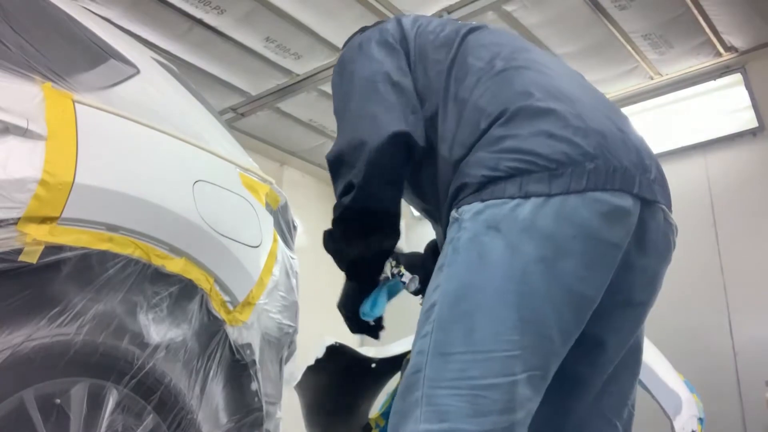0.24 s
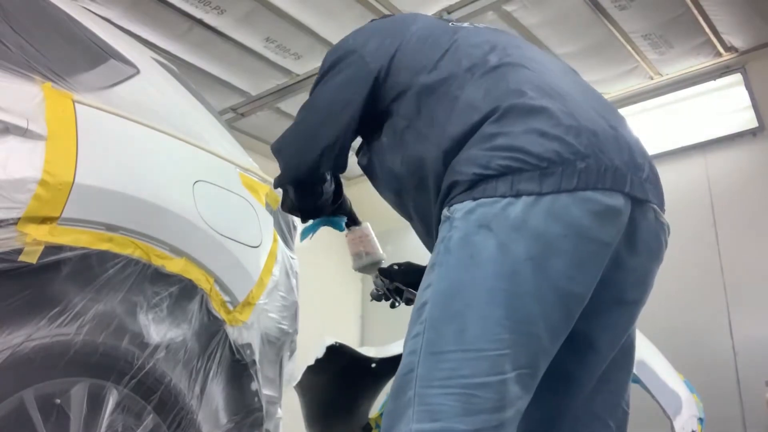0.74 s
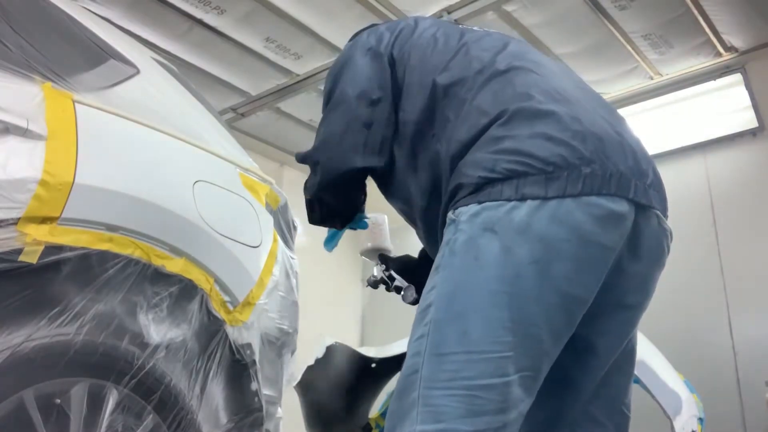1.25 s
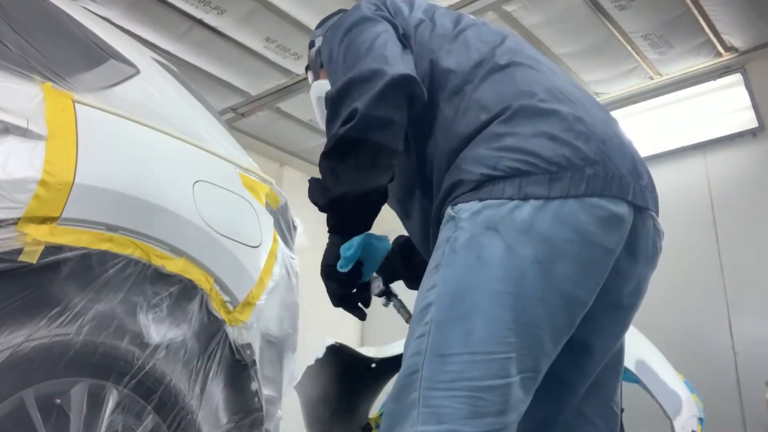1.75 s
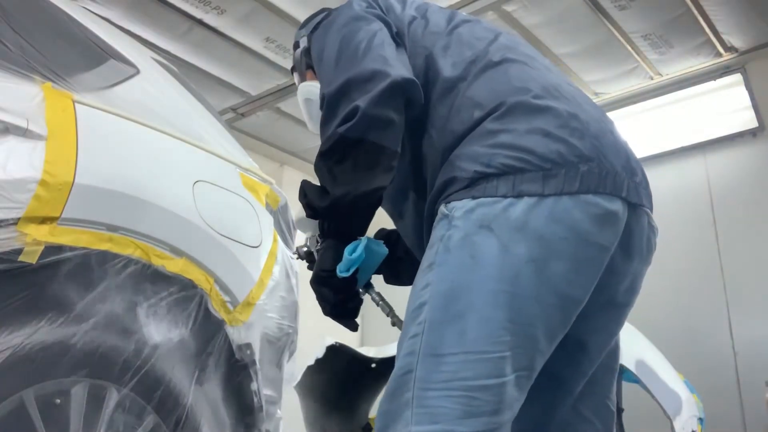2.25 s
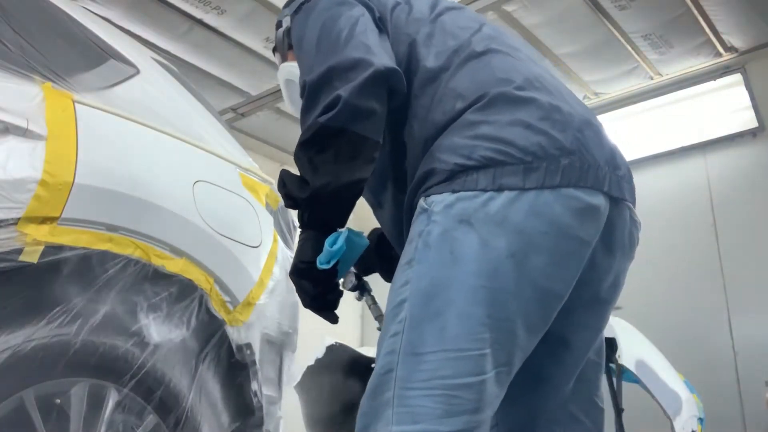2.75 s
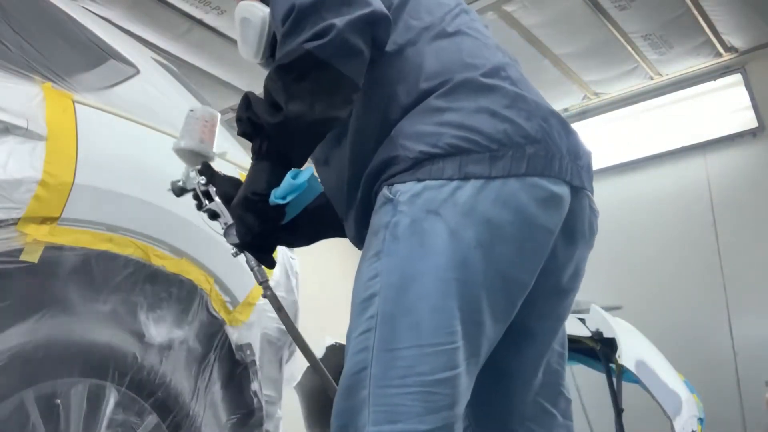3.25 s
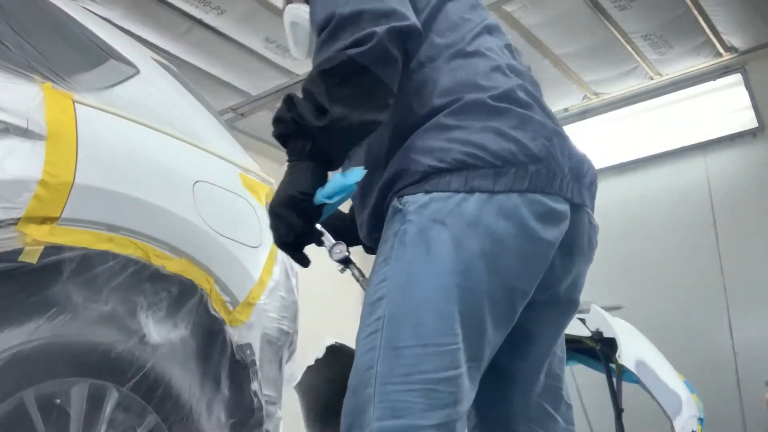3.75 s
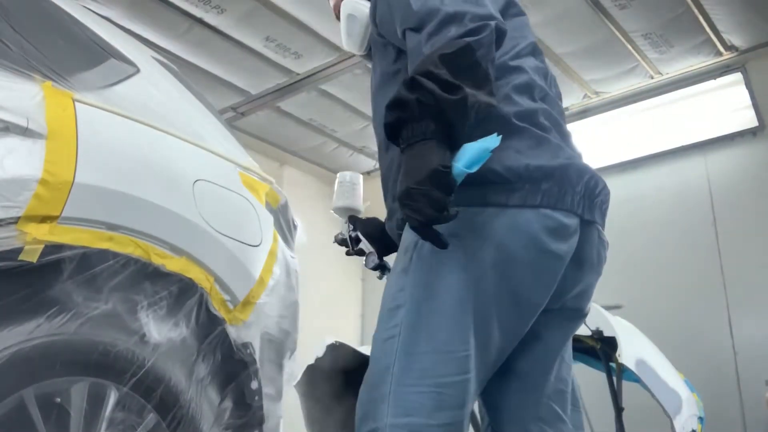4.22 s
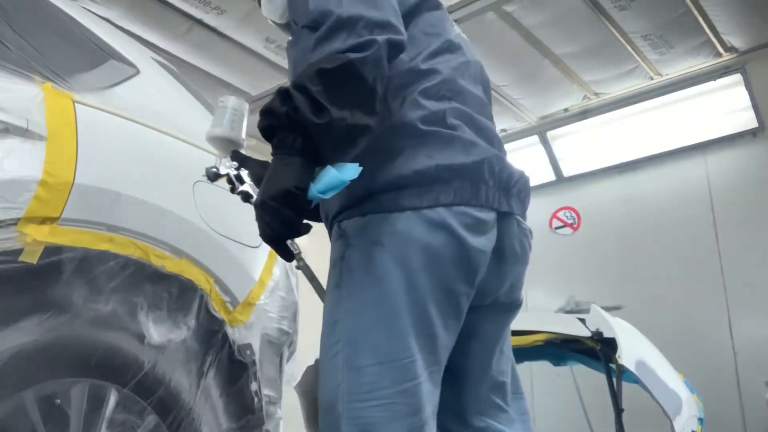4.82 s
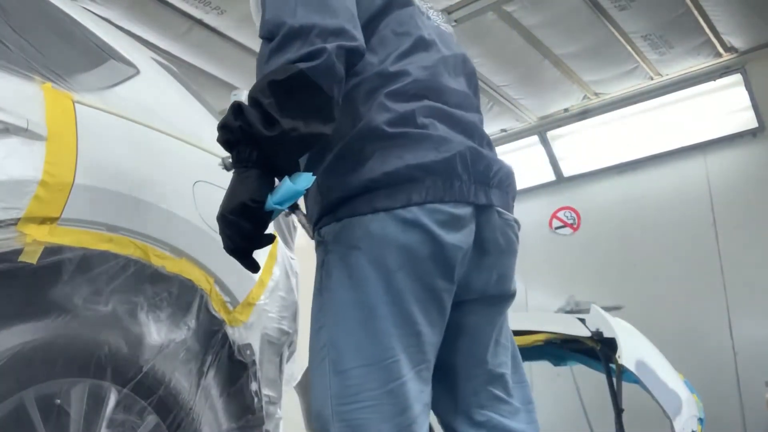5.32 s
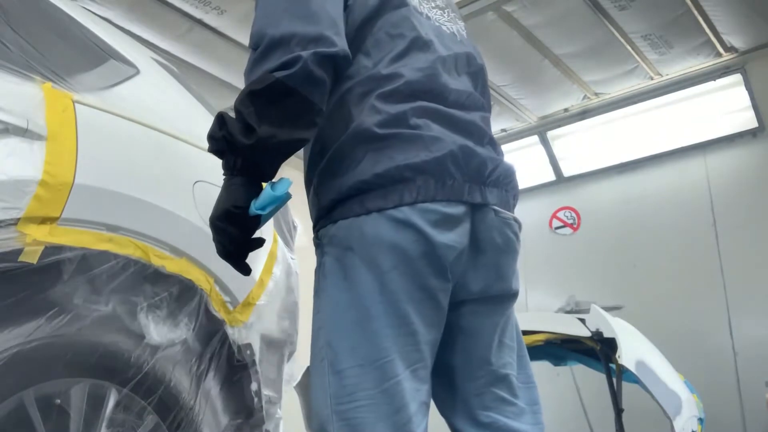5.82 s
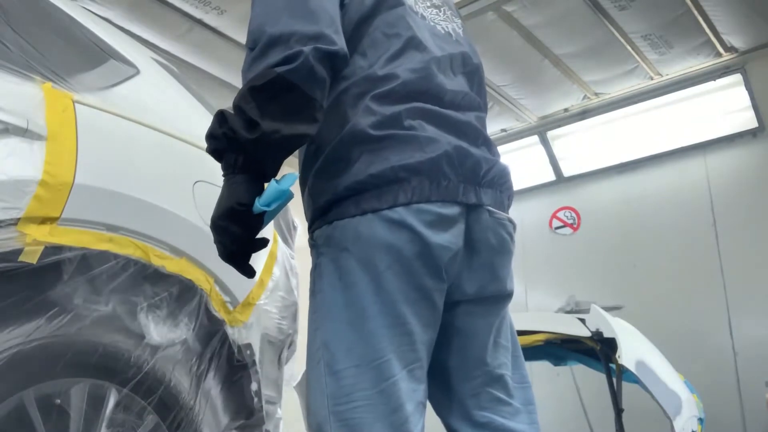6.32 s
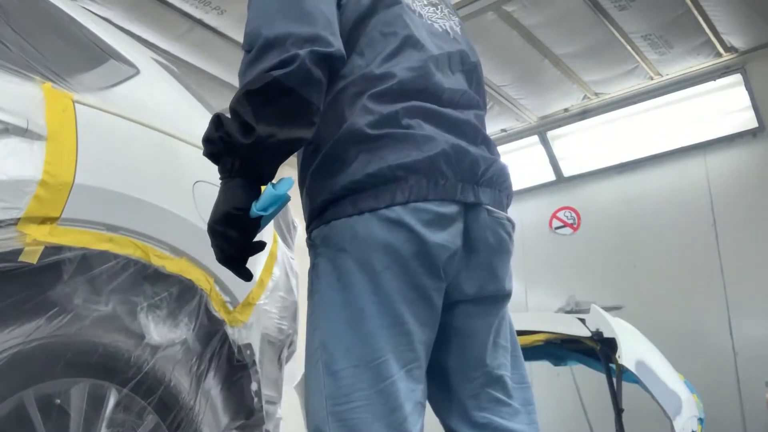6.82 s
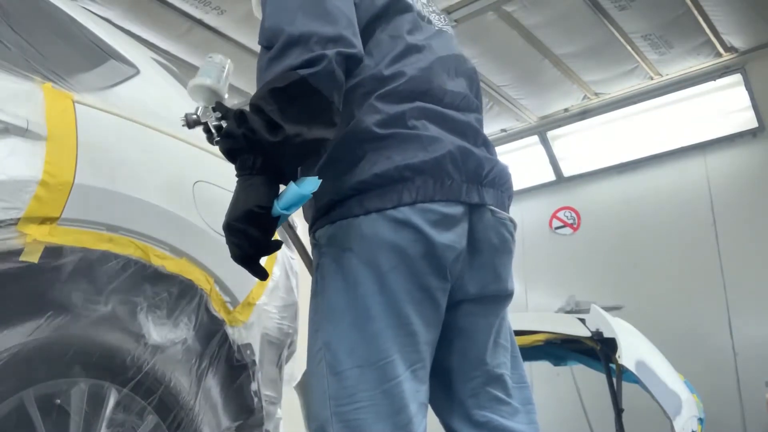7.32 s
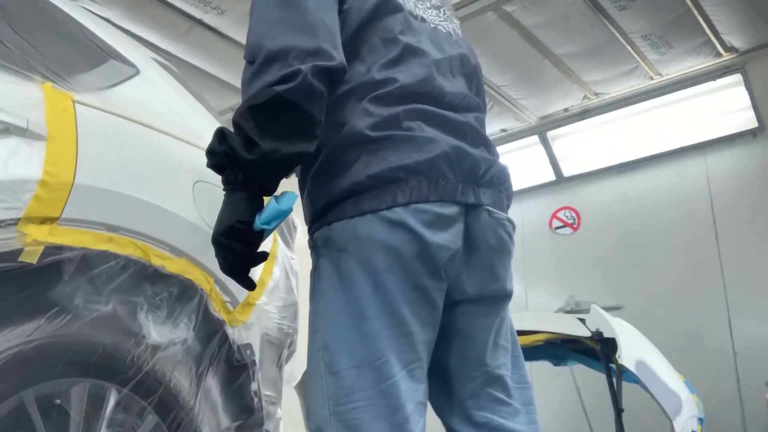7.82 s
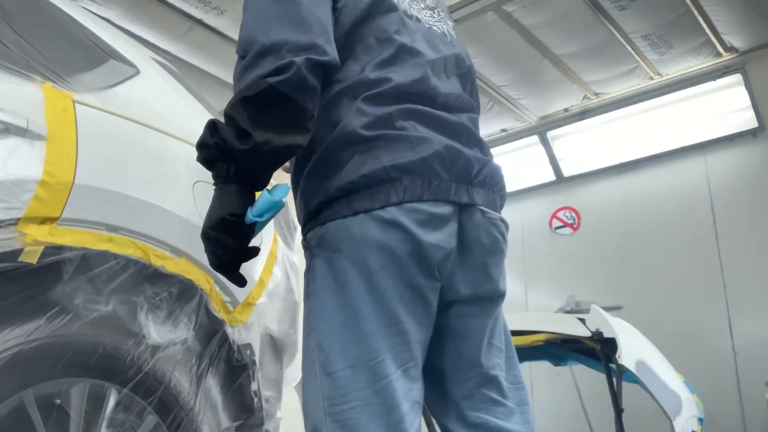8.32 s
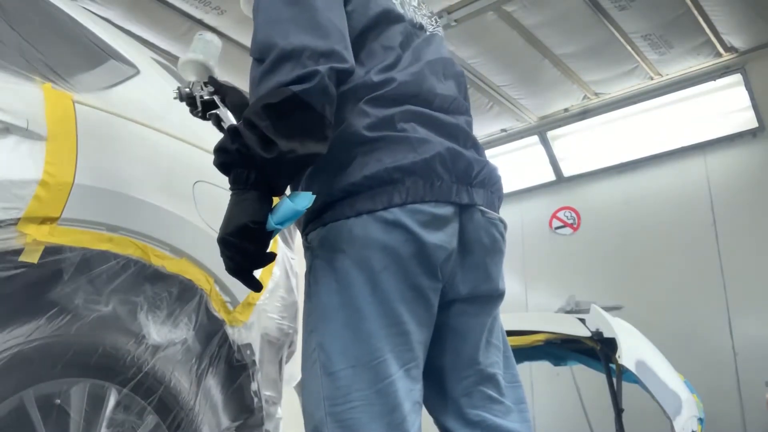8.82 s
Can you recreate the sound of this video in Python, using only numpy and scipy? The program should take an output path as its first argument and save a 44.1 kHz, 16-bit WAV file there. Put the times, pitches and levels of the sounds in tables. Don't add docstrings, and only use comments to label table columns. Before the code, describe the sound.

Throughout about nine seconds, an extraction fan fills an enclosed metal paint booth with deep duct rumble, rushing air, a wavering low hum and irregular low booms, slightly louder in the first second. A spray gun is already hissing at the start and stops at 0.2. It eases open from 0.4 to 1.1, then snaps through quicker strokes at 1.3-1.65, 1.75-2.3 and 2.35-2.7. Longer strokes follow at 2.8-4.3 and 4.4-6.0, brightening near 3.5 and 5.15 as the spray swings toward the microphone. A softer half-second burst begins at 6.25, then a gentle start at 6.8 leads into a long stroke until 8.85, brightest near 7.5 and duller around 8.3. A last hard snap comes at 8.9. Each stroke combines sharp, very high air hiss with a midrange scrub on the panel, cut quickly with a brief wall echo. Close, floor-level stereo microphone.

```python
import sys
import numpy as np
from scipy import signal
from scipy.fft import rfft, irfft, next_fast_len
from scipy.io import wavfile
from scipy.ndimage import uniform_filter1d, map_coordinates

SR = 44100
rng = np.random.default_rng(int(sys.argv[2]) if len(sys.argv) > 2 else 0)


def wrap_up_sound(samples):
    columns = np.atleast_2d(samples).T
    tamed = np.clip(columns, -1, 1)
    steps = np.round(tamed * 32767).astype(np.int16)
    wavfile.write(sys.argv[1], SR, steps)


def level_to_linear(level):
    exponent = np.asarray(level, float) / 20
    return 10 ** exponent


N = 399546

# [f/Hz, level/dB per Hz]
HISS_SPECTRUM = [(4000, -38), (6000, -10.5), (7200, -5.5), (9000, -2), (11000, -0.5), (13000, -1),
                 (15000, -0.5), (15800, 0)]
SCRUB_SPECTRUM = [(900, -28), (1600, -6), (2200, -1), (3500, -1.5), (5000, 1.5), (6300, -0.5), (7200, -4),
                  (9000, -20)]
# [t/s, opening time/s, pressure surge/dB]
TRIGGER_OPENS = [
    (.007, .011, 5),
    (.365, .08, 2.5),
    (1.271, .008, 7),
    (1.741, .008, 5),
    (2.343, .008, 8),
    (2.771, .008, 7.5),
    (4.381, .01, 6.5),
    (6.241, .011, 4.5),
    (6.829, .01, 4),
    (8.916, .009, 7.5),
]
TRIGGER_SHUTS = [.18, 1.14, 1.654, 2.272, 2.69, 4.283, 6.012, 6.757, 8.853, 9.2]
# [t/s, hiss level/dB, scrub level/dB, right port later/us]
GUN_PATH = [(0, -31, -38.5, -55), (.5, -24, -38, -60), (1.1, -28.5, -40.5, -60), (1.4, -32.5, -40, -57),
            (2.0, -30.5, -38, 0), (2.85, -30, -39.5, -2), (3.15, -27, -35.5, 79), (3.6, -28, -36, 81),
            (3.9, -28, -37, 0), (4.3, -30, -40, -5), (4.7, -27, -35.5, 70), (5.15, -27, -36, 75),
            (5.7, -32.5, -41.5, 20), (6.8, -34.5, -42, 0), (7.1, -29.5, -35.5, 60),
            (7.55, -28.5, -35.5, 76), (8.0, -33.5, -41, 0), (8.75, -28.5, -35, 80)]
# [t/s, extra hiss level/dB]
WRIST_FLIPS = [
    (.17, -1),
    (.475, -1.5),
    (1.49, 1),
    (2.27, 0.5),
    (3.474, 3),
    (4.28, -0.5),
    (5.15, 4),
    (6.0, 1.5),
    (7.462, 4.5),
    (8.33, -3.5),
]
# [t60/s, echo over direct level/dB]
BOOTH_ECHO = [
    (.21, 4),
    (.33, 7),
]

# [f/Hz, level/dB per Hz]
RUMBLE_SPECTRUM = [(20, -28), (32, -21), (42, 0), (65, -2.5), (105, -1.5), (165, -3), (260, -2.5),
                   (400, -6.5), (520, -14), (800, -31.5)]
RUSH_SPECTRUM = [(250, -19), (450, -2.5), (700, -4), (1100, -8), (1600, -13), (2200, -22), (4500, -23),
                 (5200, -28.5), (9000, -30), (15800, -35)]
BOOM_SPECTRUM = [(72, -57), (79, 3), (84, -1.5), (94, -2), (98, -12), (103, -11)]
# [f/Hz, width/Hz, level over noise/dB]
DUCT_MODES = [(59.7, 4.4, 5), (118, 12, -2), (135, 6.7, 1.5), (178.4, 5.6, 6.5), (206.4, 27, 2.5),
              (234.1, 5, 6.5), (242.6, 8.7, 3), (260, 12, 0.5), (298.3, 6, 1.5), (359, 8.2, 3),
              (403.7, 11.4, 1.5), (457, 18, 3), (762, 36, 2), (1074, 47, 2.5), (1547, 160, -2)]
# [t/s, boom rise/dB, blade tone rise/dB, duct note rise/dB]
TONE_SWELLS = [(.1, -6, 6.5, 9), (.35, 1.5, 4, 10), (.63, -1, 7, 3), (.8, 9.5, 3.5, 2), (1.0, 3, 4, 10.5),
               (1.35, 5, 8.5, 10.5), (1.84, 4.5, 5, 0), (2.2, 4, 0, 7), (2.42, 5, 8, -5), (2.8, 9.5, 4, -7),
               (3.05, 8.5, 1, -4), (3.47, 9, 9, 10), (3.88, 4, 7, 12), (4.1, 8, -4, 7), (4.3, 1, 9, 11),
               (4.6, 5.5, 0, -2), (4.8, 9.5, 11.5, -1), (5.15, 7.5, 0, 6), (5.45, 4, 7, 3),
               (5.77, 10, 8.5, 3), (5.95, 4.5, 7.5, 5), (6.2, 6.5, 0, 9), (6.5, 4, 6.5, -4),
               (6.78, 7.5, 10.5, -4), (7.1, 1.5, 4, 8), (7.5, -1, 10, 2), (7.76, 13.5, 9.5, 5),
               (8.12, 9, 9, -2), (8.5, 3, 6, -3), (8.93, 4, 3, 6)]
# [t/s, rush rise/dB]
DRAUGHTS = [
    (.42, 2),
    (8.4, 0.83),
]

# [t/s, level/dB]
CAMERA_GAIN = [(0, 3), (.45, 3), (.85, 2.5), (1.25, -0.5), (1.8, 0), (3.5, 0), (6.2, 0), (7.0, 1.5),
               (9.06, 1.5)]
# [f/Hz, likeness 0-1]
PORT_LIKENESS = [(60, .985), (200, .95), (350, .7), (560, .42), (1050, .08), (1450, .4), (1750, .2),
                 (2050, .4), (2600, .2), (4500, .12), (6300, .25), (7200, .86), (9000, .965), (13500, .985)]
# [f/Hz, left minus right level/dB]
PORT_BALANCE = [(60, -1), (250, -0.5), (480, -4), (700, .5), (1200, -0.5), (2000, -4), (2800, -1.9),
                (7000, -0.8), (15000, 0.5)]
# [f/Hz, phase/rad]
PORT_SKEW = [(40, .07), (90, .2), (170, .56), (300, .7), (430, .5), (560, -.2), (1100, 2), (1450, 2.9),
             (2000, 1.6), (2500, 1.5), (3300, 0), (6300, -.6), (7300, -.5), (8200, 0)]

FLIP_HALF_S, SWELL_HALF_S, DRAUGHT_HALF_S = 0.069, 0.089, 0.1
RUMBLE_DB, RUSH_DB, BOOM_DB = -22.5, -34, -30
BLADE_HZ, BLADE_DB = 180.5, -32.5
NOTE_HZ, NOTE_DB = 233.9, -37.5
DIRECT_SHARE = .3
PORT_LAG_S = .000263


def gun():
    hiss_db, scrub_db, later_us = curves(GUN_PATH)
    flip_db, = swells(WRIST_FLIPS, FLIP_HALF_S)
    flow = trigger()
    scrub_level = flow * level_to_linear(scrub_db + 0.5 + 0.63 * wobble(9.8))
    hiss_level = flow * level_to_linear(hiss_db + flip_db + 2.5 + 0.69 * wobble(12))
    hiss = booth(closed(HISS_SPECTRUM), hiss_level, *BOOTH_ECHO[0], patchy_db=3.5)
    scrub = booth(closed(SCRUB_SPECTRUM), scrub_level * np.sqrt(1 - DIRECT_SHARE), *BOOTH_ECHO[1],
                  patchy_db=-2.0)
    direct = scrub_level * np.sqrt(DIRECT_SHARE) * air(closed(SCRUB_SPECTRUM), patchy_db=4.5)[0]
    return hiss + scrub, sighted(direct, later_us)


def trigger():
    t = np.arange(N) / SR
    flow = np.zeros(N)
    for (opens, rise_s, surge_db), shuts in zip(TRIGGER_OPENS, TRIGGER_SHUTS):
        opening = np.clip((t - opens) / rise_s, 0, 1) ** 2
        surge = level_to_linear(surge_db * np.exp(-np.clip(t - opens - rise_s, 0, None) / 0.014))
        thinning = level_to_linear(-3 * np.exp(-np.clip(shuts - t, 0, None) / 0.014))
        cut = np.exp(-np.clip(t - shuts, 0, None) / 0.013)
        flow += opening * surge * thinning * cut
    return flow


def booth(colour, level, t60_s, echo_db, patchy_db):
    keep = level_to_linear(-2 * 60 / t60_s / SR)
    stored_power = signal.lfilter([1 - keep], [1, -keep], level ** 2)
    echo = level_to_linear(echo_db) * np.sqrt(stored_power) * air(colour, patchy_db / 2)
    direct = level * air(colour, patchy_db)
    return (direct + echo) / np.sqrt(1 + level_to_linear(2 * echo_db))


def sighted(x, later_us):
    half = later_us * SR / 2e6
    return np.array([map_coordinates(x, [np.arange(N) + side * half], mode="nearest")
                     for side in (1, -1)])


def fan():
    gain_db, = curves(CAMERA_GAIN)
    boom_db, blade_db, note_db = swells(TONE_SWELLS, SWELL_HALF_S)
    draught_db, = swells(DRAUGHTS, DRAUGHT_HALF_S)
    rumble = level_to_linear(RUMBLE_DB + 0.86 * wobble(7.1)) * steady(ducted(RUMBLE_SPECTRUM))
    rush_db = RUSH_DB + draught_db + 0.18 * gain_db + 0.96 * wobble(5.5)
    rush = level_to_linear(rush_db) * steady(ducted(RUSH_SPECTRUM))
    boom = level_to_linear(BOOM_DB + boom_db) * evened(steady(closed(BOOM_SPECTRUM)))
    blade = level_to_linear(BLADE_DB + blade_db) * hum(BLADE_HZ, drift_rad=.9, rate_hz=6)
    note = level_to_linear(NOTE_DB + note_db) * hum(NOTE_HZ, drift_rad=1.63, rate_hz=12)
    return level_to_linear(gain_db) * (rumble + rush + boom + blade + note)


def ducted(spectrum):
    def gain(hz):
        power = 1
        for centre_hz, width_hz, db in DUCT_MODES:
            power = power + level_to_linear(2 * db) / (1 + (2 * (hz - centre_hz) / width_hz) ** 4)
        return closed(spectrum)(hz) * np.sqrt(power)
    return gain


def evened(x):
    power = np.abs(uniform_filter1d(x ** 2, size=round(0.11 * SR), axis=1)) + .01
    return unit(x / np.sqrt(power))


def hum(hz, drift_rad, rate_hz):
    phase = 2 * np.pi * hz * np.arange(N) / SR + drift_rad * wobble(rate_hz)
    return np.sqrt(2) * np.sin(phase) * [[1], [0]]


def steady(gain):
    return unit(filtered(rng.standard_normal((2, N)), gain))


def air(gain, patchy_db):
    hz, _, z = signal.stft(rng.standard_normal((2, N)), SR, nperseg=512)
    field = rng.standard_normal(z.shape[1:])
    field = uniform_filter1d(field, size=7, axis=0)
    field = uniform_filter1d(field, size=10, axis=1)
    z = z * gain(hz)[:, None] * level_to_linear(patchy_db * unit(field))
    return unit(signal.istft(z, nperseg=512)[1][:, :N])


def closed(spectrum):
    return lambda hz: level_to_linear(along(spectrum, hz)) * (hz > spectrum[0][0]) * (hz < spectrum[-1][0])


def swells(rows, half_s):
    s, *cols = np.transpose(rows)
    coarse = np.arange(0, N + 256, 256) / SR
    bell = np.exp(-((coarse - s[:, None]) / half_s) ** 2)
    return [np.interp(np.arange(N) / SR, coarse, c @ bell) for c in cols]


def curves(rows):
    s, *cols = np.transpose(rows)
    return [np.interp(np.arange(N) / SR, s, c) for c in cols]


def wobble(rate_hz):
    knots = rng.standard_normal(int(N * rate_hz / SR) + 4)
    return map_coordinates(knots, [np.arange(N) * rate_hz / SR])


def along(points, hz):
    f, v = np.transpose(points)
    return np.interp(np.log(hz + 1), np.log(f + 1), v)


def filtered(x, response):
    m = next_fast_len(N + SR // 2)
    return irfft(rfft(x, m) * response(np.fft.rfftfreq(m, 1 / SR)), m)[..., :N]


def unit(x):
    return x / np.sqrt(np.mean(x ** 2) + 1e-20)


def ports(field):
    def mixing(hz):
        turn = np.arccos(np.clip(along(PORT_LIKENESS, hz), -1, 1)) / 2
        return np.array([np.cos(turn), np.sin(turn)])

    def split(hz):
        phase = np.pi * PORT_LAG_S * hz - along(PORT_SKEW, hz) / 2
        half = level_to_linear(along(PORT_BALANCE, hz) / 2) * np.exp(1j * phase)
        return np.array([half, 1 / half])

    same, other = filtered(field, mixing)
    return filtered(np.array([same + other, same - other]), split)


def scene():
    scattered, direct = gun()
    return ports(fan() + scattered) + direct


def roll_off(x):
    return signal.sosfilt(signal.butter(12, 17080, fs=SR, output="sos"), x)


def record(dry):
    ceiling, knee = .68, 4
    held = dry / (1 + np.abs(dry / ceiling) ** knee) ** (1 / knee)
    mix = filtered(held, lambda hz: hz < 15760)
    return roll_off(mix)


dry = scene()
out = record(dry)
wrap_up_sound(out)
```